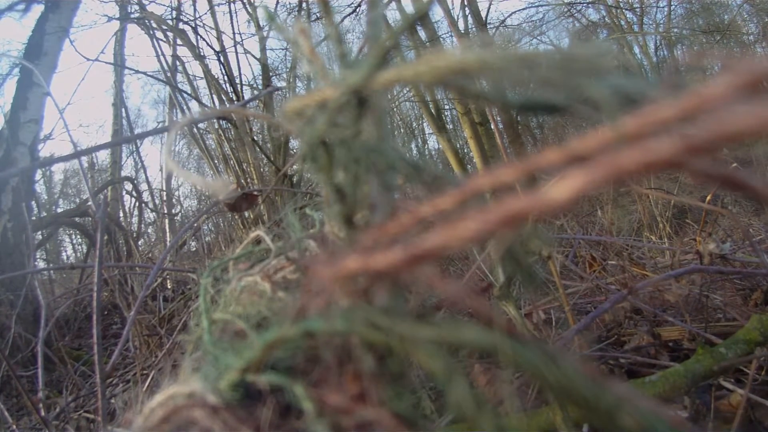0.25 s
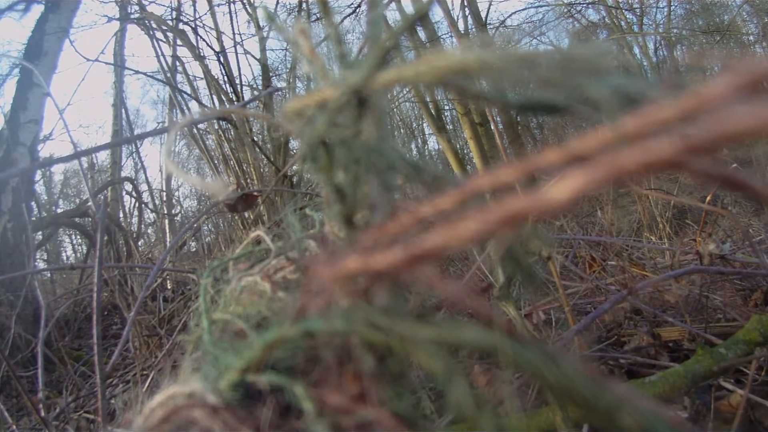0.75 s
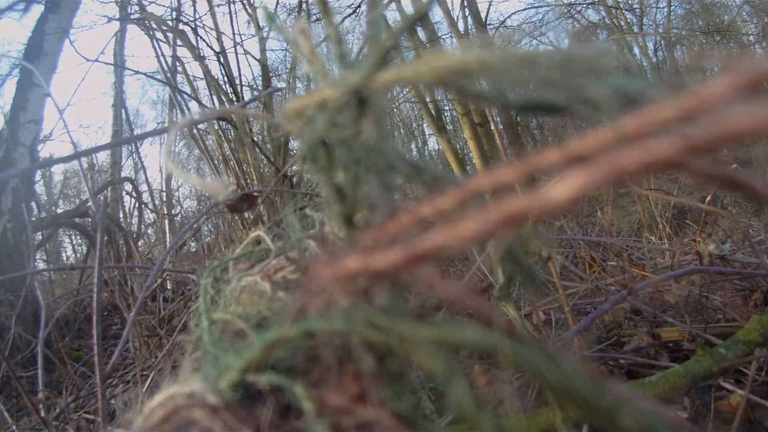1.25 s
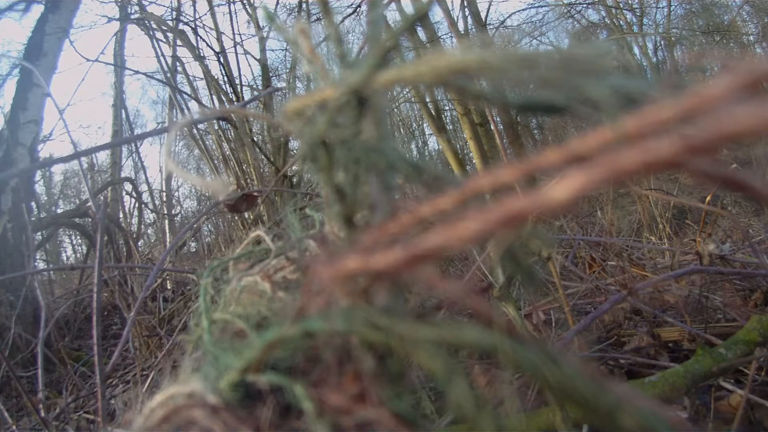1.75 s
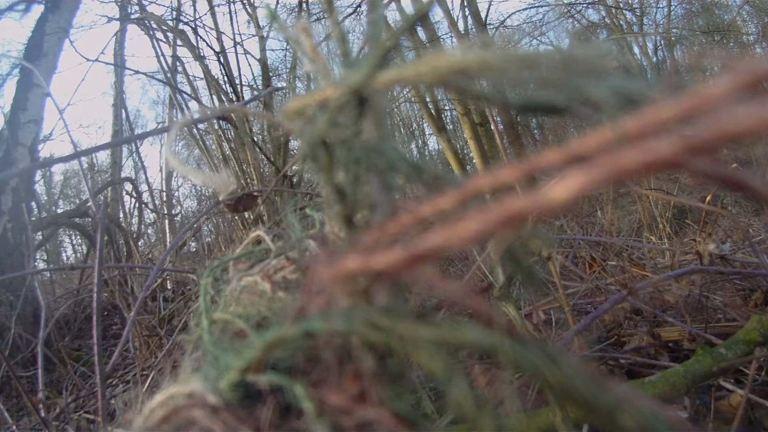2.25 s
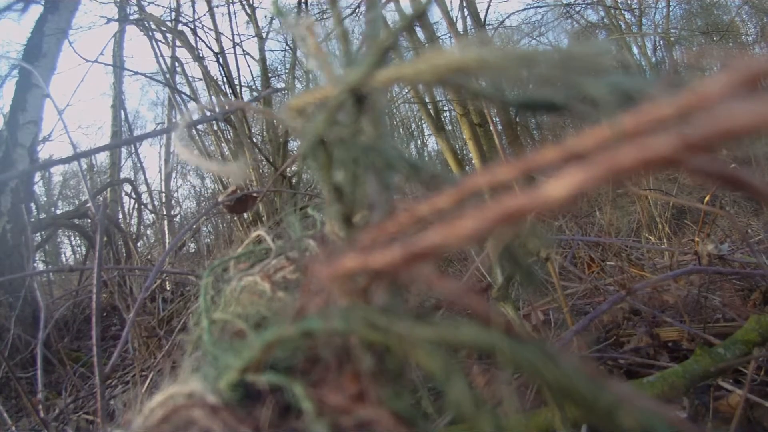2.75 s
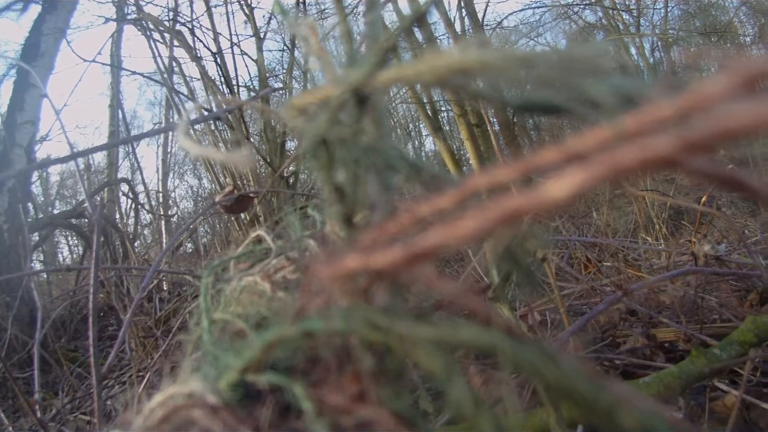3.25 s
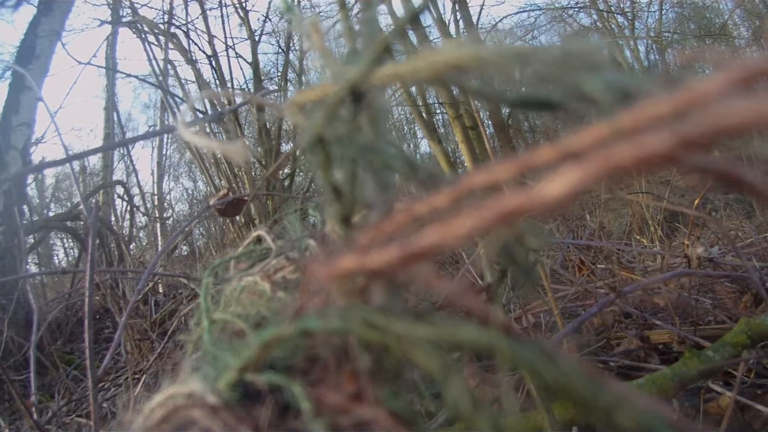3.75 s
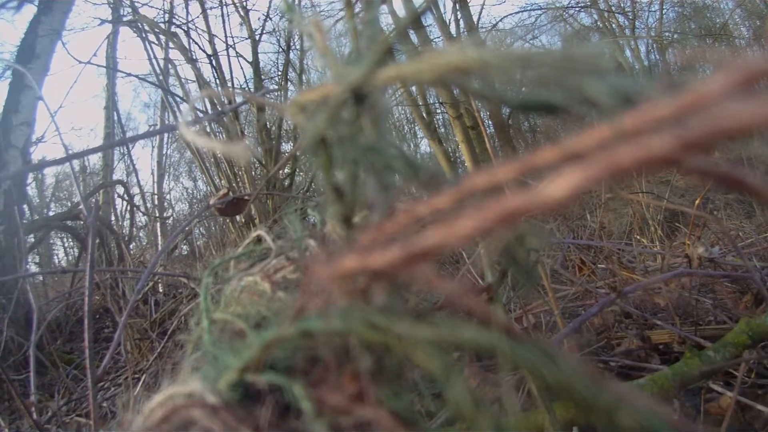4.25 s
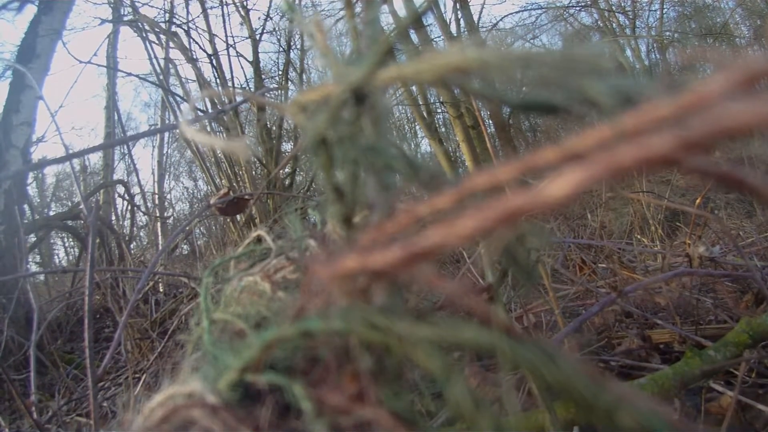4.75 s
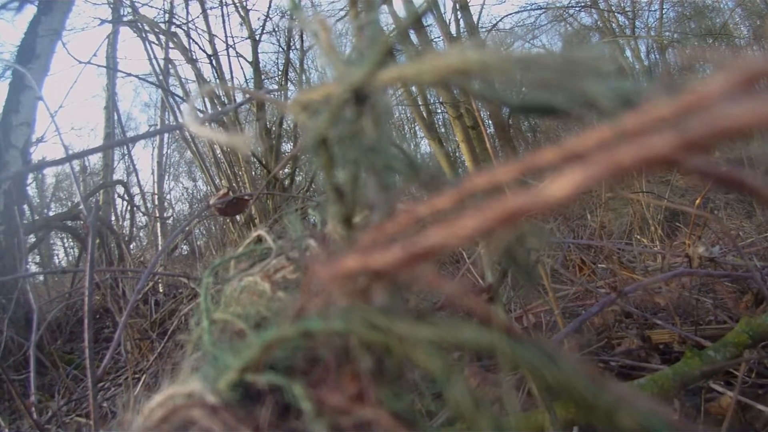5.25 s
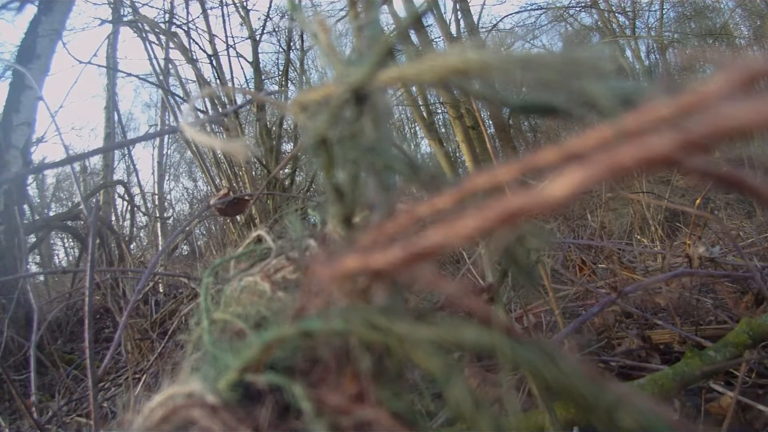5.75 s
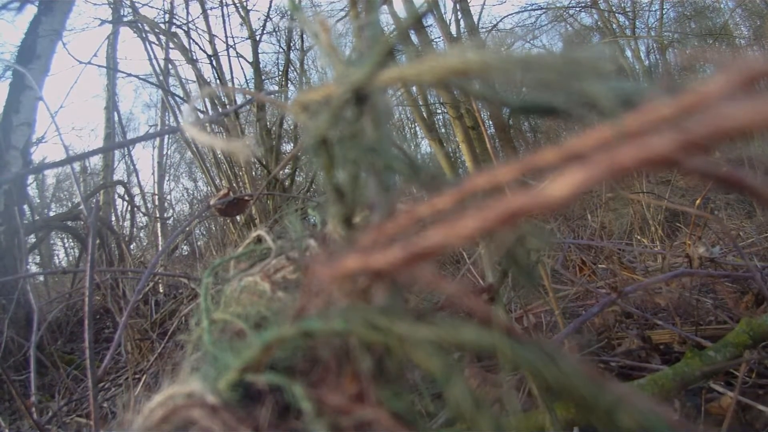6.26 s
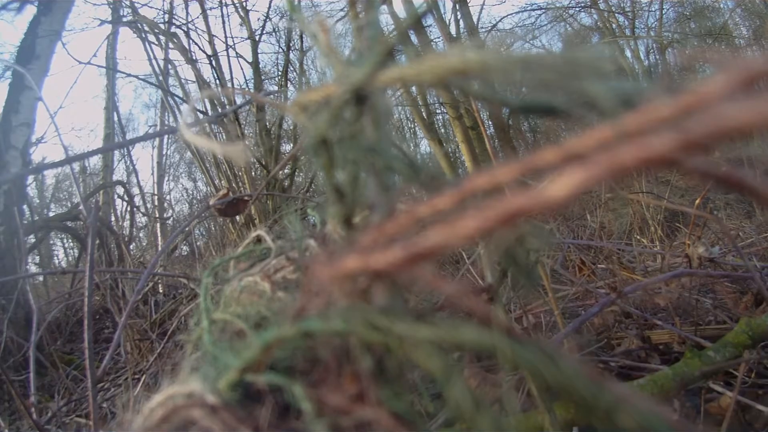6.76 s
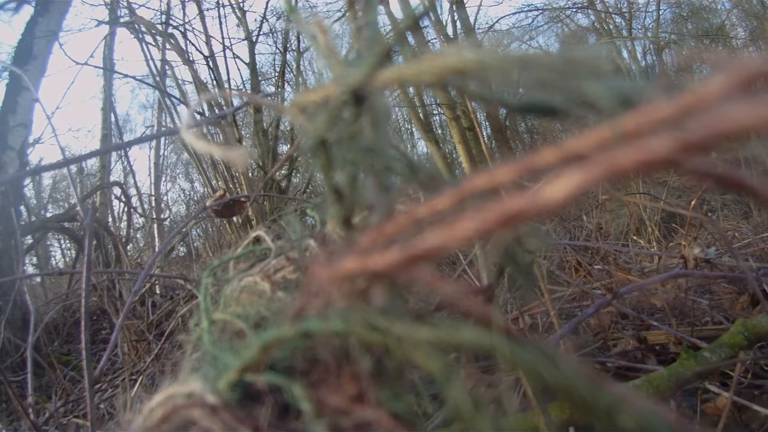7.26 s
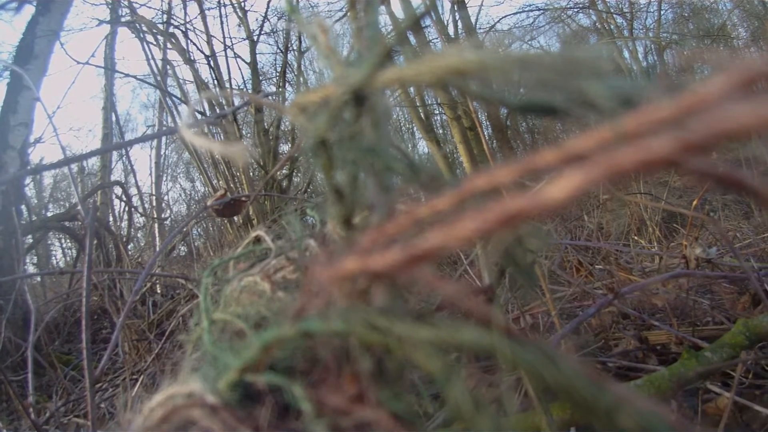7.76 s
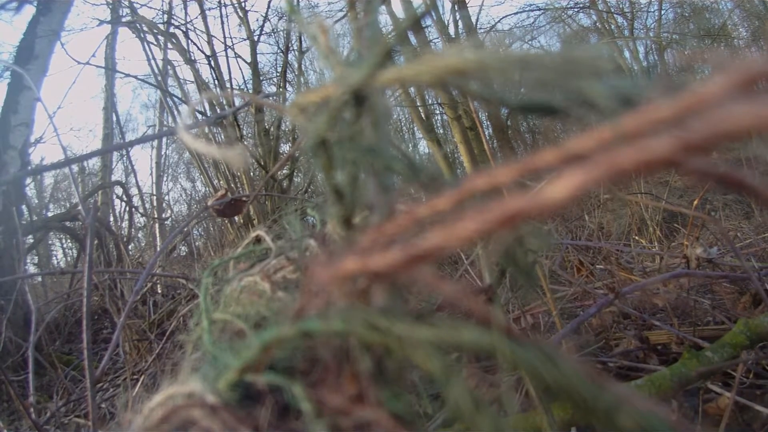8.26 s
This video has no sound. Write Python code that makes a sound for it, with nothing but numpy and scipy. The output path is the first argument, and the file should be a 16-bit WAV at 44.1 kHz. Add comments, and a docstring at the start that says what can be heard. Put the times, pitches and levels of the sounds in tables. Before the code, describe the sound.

A quiet wood with soft hush and faint hiss. A far electric airsoft gun rattles off a rapid burst, then two more cracks, each washed in tree echo. Right at the microphone another fires four separate shots: trigger click, short rising gear whine, hard bright slam, latch clack. Between them twigs or pellets snap, dry leaves rustle, and light wind rumbles and thuds on the microphone.

```python
"""Toy gun in a wood

An electric airsoft gun fires four single shots: gears rattle and whine, the piston slams, a latch clacks.
A far gun fires bursts, each shot a noise crack with a bounce and a wash of echo; twigs snap as short noise.
Dry brush rustles as grainy noise, faint tones glide as sines, and wind rumbles and thuds on the microphone.
The wood hushes softly behind it all, and each channel of the amplifier adds its own hiss.
"""
import sys
import numpy as np
from scipy import signal
from scipy.fft import rfft, irfft, next_fast_len
from scipy.io import wavfile
from scipy.ndimage import uniform_filter1d, map_coordinates

SR = 44100
rng = np.random.default_rng(int(sys.argv[2]) if len(sys.argv) > 2 else 0)


def put_to_file(sound):
    """Save the sound as 16-bit audio at rate SR, in the file named by the first command-line argument."""
    columns = np.atleast_2d(sound).T  # one column per channel
    safe = np.clip(columns, -1, 1)
    whole_steps = np.round(safe * 32767)
    wavfile.write(sys.argv[1], SR, whole_steps.astype(np.int16))


N = 375732
T = np.arange(N) / SR  # time of every sample, in seconds

# All levels are those of the sounds before record() shapes them.
# A t60 is the time in which a sound dies by 60 dB.

# The four near shots: bite_s (gears start), release_s (piston let go), whine_db (rms), hum_db
SHOTS = [(2.682, 2.7697, -22.5, -53.5), (3.77, 3.854, -24.5, -54), (4.9851, 5.0671, -21.5, -52.5),
         (7.2541, 7.3395, -21, -60.5)]
# Gear rattle through one cycle: phase (0 bite, 1 release, then 1 more each 0.1 s of coasting), level_db
GEAR_CYCLE = [(0, -50.5), (.07, -23.5), (.17, -26.5), (.33, -16), (.95, -12), (1.12, -2), (1.28, -15),
              (1.5, -12), (1.68, -17), (1.95, -35), (2.6, -54.5)]
# Tooth whine while the spring is wound: phase, pitch_hz, level_db (added to the shot's whine_db)
TOOTH_WHINE = [(0.25, 1050, -23.5), (.45, 1270, -5), (.6, 1410, 0), (.86, 1542, 0), (.95, 1550, -18.5)]
# Ringing of the gearbox shell: pitch_hz, width_hz, level_db
SHELL_RINGS = [(970, 130, -2), (1940, 340, -3), (3030, 440, -4), (3650, 120, -2), (4460, 100, -1.5),
               (5680, 290, 2.5), (6800, 1000, -3), (10000, 1400, -5.5)]
# Colour of the gear rattle: pitch_hz, level_db
RATTLE_COLOUR = [(24, -55), (40, -18), (653, -5.5), (926, -8.5), (1190, -11), (1450, -5), (1730, -12),
                 (1960, -9), (2710, -9.5), (3840, -9), (5050, -9), (5720, -8), (15500, -31)]
# The piston's slam: pitch_hz, level_db (typical), t60_s, late_s (after release)
SLAM_RINGS = [(5800, 15.5, 0.031, 0.0028), (6220, -3.5, 0.065, 0.0099), (1036, 7.5, 0.016, .008),
              (3970, 1, 0.029, .009), (249, -14, 0.11, 0), (80, -25, .07, 0)]
# The main spring humming on: pitch_hz, level_db (added to the shot's hum_db), t60_s
SPRING_HUM = [(747, 0, 1.8), (1150, -4.5, 2.2)]
# The trigger clicks twice before the gears bite: start_s (first click), level_db (its peak)
TRIGGER_CLICKS = [(2.652, -30), (3.746, -27.5), (4.964, -21)]
# The latch stops the coasting gears: start_s, level_db (peak)
LATCH_CATCHES = [(2.8979, 7.5), (3.9623, -4), (5.1879, 4.5), (7.4532, 0)]
# Contacts of every cycle, each: late_s, level_db (peak), knock_db (peak of the stock knock)
TEETH_MEET = (.0058, -7.5, -29)  # late after the bite
PISTON_RECOIL = (.034, -1, -38)  # late after the release
LATCH_REBOUND = (0.0079, -17, -34)  # late after the latch catches
# Loose contacts outside the cycle: start_s, level_db (peak), knock_db (peak of the stock knock)
LOOSE_CLACKS = [(2.8212, -5.5, -44), (2.9244, -14, -26)]
# Colour of metal contacts: pitch_hz, level_db
CLACK_COLOUR = [(180, -41), (300, -7.5), (1540, -7), (1970, -3.5), (4490, -4), (4960, -5), (6150, -3),
                (7020, -11), (9600, -10.5), (10600, -26), (15500, -22)]
LATCH_KNOCK_DB, CLACK_T60_S = -22.5, 0.02

# Shots of the far gun: start_s, level_db (peak of the crack)
FAR_SHOTS = [(1.1924, -22), (1.2967, -22), (1.3994, -20), (1.508, -21.5), (1.615, -23), (1.7242, -21),
             (1.8365, -22.5), (1.966, -28), (2.4654, -23), (2.574, -21)]
# Colour of the far gun: pitch_hz, level_db
FAR_COLOUR = [(400, -40), (1000, -6.5), (1500, -6.5), (2500, -12), (3100, -9.5), (3600, -2.5), (4300, -1.5),
              (4900, -1), (5400, -3.5), (6000, -0.5), (6700, -6.5), (8000, -13), (9500, -25),
              (15000, -50.5)]
FAR_ECHO_DB = 13.5  # echo energy over crack peak
# How long the trees' answer lasts: pitch_hz, t60_s
TREE_ECHO = [(300, 0.47), (2000, .5), (6000, .6), (12000, 0.42)]

# Snaps of pellets and twigs: start_s, level_db (bright peak), dull_db and echo_db (over that peak)
SNAPS = [(0.0866, -31.5, -8, -6), (0.332, -32.5, -21, -8), (0.469, -37, -10, -9), (2.9746, -19, -25, 3.5),
         (3.247, -38, -1.5, -2.5), (3.341, -36, -7, -3), (3.4744, -32.5, -10, -6.5), (4.2193, -40, 5.5, 0),
         (4.3482, -32, -5.5, 1), (4.367, -35.5, -5, -0.5), (4.376, -35, -1.5, -2), (4.415, -38, -5, 0.3),
         (5.6397, -14.5, -45, 3), (5.7667, -41, 4.5, 5), (5.8665, -41.5, -5, 16.5),
         (6.2713, -40, -19.5, -2.5), (7.1031, -34.5, -19, 0.7), (7.9172, -12.5, -45.5, 3),
         (7.981, -30, -2.5, -0.5), (8.275, -37, -23, 2.1)]
# Decay of a snap at -34.5 dB; louder snaps are harder and die sooner
SNAP_T60_S, SHARPER_PER_DB = 0.018, 0.07
CRACKLE_DB, CRACKLE_SPREAD_DB = -45.5, 3  # faint twigs: lowest peak, average extra

# Rustles of dry brush: start_s, level_db (before the swell and decay), t60_s
RUSTLES = [(0.19, -55.5, 0.29), (1.948, -46, .05), (2.105, -51, 0.48), (2.441, -42.5, 0.18),
           (3.174, -43, 0.27), (3.221, -34, 1.07), (4.12, -47, 0.59), (4.811, -55.5, 0.27), (5.9, -57, 1.8),
           (6.45, -54, 2), (6.999, -56.5, 1.32), (8.37, -54, 0.38)]
# Colour of dry leaves: pitch_hz, level_db
LEAF_COLOUR = [(760, -51.5), (1300, -15.5), (1850, -4), (2710, -6.5), (4780, -1), (6870, -7), (9080, -26),
               (12000, -28.5), (15600, -61.5), (22000, -120)]
RISE_S = 0.011  # rise time at a t60 of 1 s; it grows with the square of the t60

# Faint high tones that bend on the way, the last perhaps a bird:
# start_s, length_s, pitch_hz, sag_hz, end_hz (end over start), level_db
GLIDING_TONES = [(4.08, .14, 2690, -4, 60, -55), (4.12, .12, 2260, 0.5, 110, -59.5),
                 (4.445, .055, 5250, 60, -30, -61), (8.226, 0.071, 5480, 210, -170, -50.5)]

# Strength of the wind: time_s, rumble_db (rms)
WIND_STRENGTH = [(0.0, -82), (2.5, -79), (3.1, -65), (4.05, -66.5), (4.9, -59), (5.3, -55.5), (5.75, -64),
                 (6.0, -56.5), (6.5, -54.5), (6.8, -55.5), (7.3, -58), (8.52, -69)]
# Colour of the wind rumble: pitch_hz, level_db
GUST_COLOUR = [(12, -31.5), (20, 7), (44, 1), (107, -13.5), (216, -18), (400, -19), (520, -54), (880, -120)]
# Wind thuds at set times: start_s, level_db (peak)
SET_THUDS = [(4.829, -44), (6.011, -38.5), (6.349, -41), (6.397, -38), (6.43, -38.5), (6.45, -42),
             (6.544, -45), (6.584, -45), (6.619, -42), (6.66, -44), (7.979, -37.5)]
THUD_OVER_WIND_DB, THUD_SPREAD_DB = 9, 2  # further thuds: lowest peak over the rumble, average extra
# Colour of the hush of the wood: pitch_hz, level_db
HUSH_COLOUR = [(18, -27), (30, 1.5), (43, 1), (144, -0.5), (606, -8), (728, -6), (1170, -5), (3400, -9),
               (5450, -7), (9190, -16), (14300, -19), (15500, -24)]
# Colour of the amplifier hiss: pitch_hz, level_db
HISS_COLOUR = [(290, -44), (500, -22.5), (1240, -2), (1750, -14), (1930, -8.5), (4840, -4.5), (15500, 0.5)]
HUSH_DB, HISS_DB = -54.5, -61
TOP_HZ = 15600  # nothing sounds above this pitch


def gun():
    """The near gun: turning gears, piston slams, metal contacts and trigger clicks."""
    return gears() + slams() + contacts() + trigger()


def gears():
    """Teeth rattle in the shell all cycle long; under load their rate sings as a rising whine."""
    out = np.zeros(N)
    uneven = amp(2.3 * wobble(700) + 0.56 * wobble(70))
    rattle = unit(filtered(uneven * noise(RATTLE_COLOUR), lambda f: shell(f) ** 1.24))
    for bite, release, whine_db, _ in SHOTS:
        phase = np.interp(T, [bite, release, release + 0.2], [0, 1, 3], left=-1)
        rattle_db = np.interp(phase, *np.transpose(GEAR_CYCLE), left=-120, right=-120)
        out += amp(rattle_db) * rattle
        out += whine(phase, whine_db)
    return out


def whine(phase, level_db):
    """Worn teeth sing a tone with two overtones that wavers in pitch and size."""
    at, hz, db = np.transpose(TOOTH_WHINE)
    pitch = np.interp(phase, at, hz) * (1 + 0.0081 * wobble(150))
    turn = 2 * np.pi * np.cumsum(pitch) / SR
    tooth = unit(np.sin(turn) + 0.27 * np.sin(2 * turn) + 0.33 * np.sin(3 * turn))
    swell_db = np.interp(phase, at, db, left=-120, right=-120)
    return amp(level_db + swell_db + 1.0 * wobble(200)) * tooth


def shell(f):
    """The gearbox shell strengthens some pitches of what moves in it."""
    return 0.16 + sum(amp(db) * np.abs(band(f, hz, width)) for hz, width, db in SHELL_RINGS)


def slams():
    """The piston rings the cylinder head, the trees answer and the spring hums on."""
    out, t = np.zeros(N), T[:SR]
    for _, release, _, hum_db in SHOTS:
        for hz, db, t60, late in SLAM_RINGS:
            drift = np.cumsum(rng.normal(0, 0.08, SR))
            ring = burst(t, 0.00046, t60) * np.sin(2 * np.pi * hz * t + drift)
            add(out, release + late, amp(db + rng.normal(0, 0.9)) * ring)
        add(out, release, amp(-2) * burst(t, 0.00074, 0.05) * noise(CLACK_COLOUR, size=SR))
        add(out, release, amp(6.0) * echo(lambda f: amp(along(RATTLE_COLOUR, f)) * shell(f)))
        for hz, db, t60 in SPRING_HUM:
            add(out, release, amp(hum_db + db - 60 * t / t60) * np.sin(2 * np.pi * hz * t))
    return out


def contacts():
    """Small metal hits crack as bursts of noise and knock the hollow stock."""
    out, t = np.zeros(N), T[:SR // 5]
    hollow = lambda f: np.abs(band(f, 450, 700))
    for s, db, knock_db in contact_list():
        # a sharp hit with a ragged, weaker shudder behind it
        shape = burst(t, 0.00081, CLACK_T60_S) + 0.07 * burst(t, 0.0033, 5.2 * CLACK_T60_S)
        crack = shape * filtered(noise(CLACK_COLOUR, size=len(t)), shell)
        drift = np.cumsum(rng.normal(0, 0.014, len(t)))
        knock = burst(t, 0.0051, 0.069) * np.sin(2 * np.pi * 246 * t + drift)
        hollow_noise = unit(filtered(rng.standard_normal(len(t)), hollow))
        knock += 0.56 * burst(t, 0.0037, 0.065) * hollow_noise
        add(out, s, peak(crack, db) + peak(knock, knock_db))
    return out


def contact_list():
    """Metal parts touch at set points of each cycle: rows of start_s, level_db, knock_db."""
    rows = list(LOOSE_CLACKS)
    for (bite, release, *_), (latch, latch_db) in zip(SHOTS, LATCH_CATCHES):
        rows.append((latch, latch_db, LATCH_KNOCK_DB))
        for s, contact in (bite, TEETH_MEET), (release, PISTON_RECOIL), (latch, LATCH_REBOUND):
            late, db, knock_db = contact
            rows.append((s + late, db, knock_db))
    return rows


def trigger():
    """The trigger clicks twice, as two short bursts of metal-coloured noise."""
    out, t = np.zeros(N), T[:SR // 5]
    for s, db in TRIGGER_CLICKS:
        first = burst(t, 0.0005, 0.015) * noise(CLACK_COLOUR, size=len(t))
        second = burst(t, 0.00046, 0.025) * noise(CLACK_COLOUR, size=len(t))
        add(out, s, peak(first, db))
        add(out, s + 0.0067, peak(second, db - 2))
    return out


def far_gun():
    """Each far shot is a short crack, a bounce off the ground and a long wash."""
    out, t = np.zeros(N), T[:SR // 10]

    def crack_tone(f):
        """The crack is stronger around three pitches, the top one a ring of the microphone."""
        low, middle = np.abs(band(f, 3600, 350)), np.abs(band(f, 5000, 400))
        return 0.81 + low + middle + 0.5 * np.abs(band(f, 6050, 310))

    def wash(f):
        """The echo is stronger around two pitches."""
        return 0.55 + 0.6 * np.abs(band(f, 4300, 700)) + 0.96 * np.abs(band(f, 6000, 700))

    for s, db in FAR_SHOTS:
        crack = burst(t, 0.0021, 0.0173) * filtered(noise(FAR_COLOUR, size=len(t)), crack_tone)
        crack = peak(crack, db)
        add(out, s, crack)
        add(out, s + 0.0084, amp(-10.0 + rng.normal(0, 1.5)) * crack)  # the bounce
        answer = echo(lambda f: amp(along(FAR_COLOUR, f)) * wash(f))
        add(out, s, amp(db + FAR_ECHO_DB) * answer)
    return out


def snaps():
    """Pellets and twigs make brief bursts: a bright crack, a duller body and the trees' answer."""
    out, t = np.zeros(N), T[:SR // 10]
    bright = lambda f: np.abs(band(f, 5560, 4400)) ** 2 / (1 + (f / 10000) ** 4)
    dull = lambda f: np.abs(band(f, 1300, 1600)) ** 2
    faint = []
    for at, size in rng.random(size=(12, 2)):  # faint twigs at chance times
        db = CRACKLE_DB - CRACKLE_SPREAD_DB * np.log(1 - size)
        faint.append((at * T[-1], db, -14, -1.5))
    for s, db, dull_db, echo_db in [*SNAPS, *faint]:
        t60 = SNAP_T60_S * np.exp(-SHARPER_PER_DB * (db + 34.5))
        for colour, top_db in (bright, db), (dull, db + dull_db):
            grains = filtered(rng.standard_normal(len(t)), colour)
            add(out, s, peak(burst(t, 0.00075, t60) * grains, top_db))
        add(out, s, amp(db + echo_db) * echo(bright))
    return out


def brush():
    """Dry leaves: finely grained noise that swells and dies away, long rustles swelling more slowly."""
    swell, t = np.zeros(N), T[:2 * SR]
    for s, db, t60 in RUSTLES:
        rise = 1 - np.exp(-t / (RISE_S * t60 ** 2))
        add(swell, s, amp(db - 60 * t / t60) * rise)
    grain = amp(1.6 * wobble(380) + 0.6 * wobble(14))
    return swell * unit(grain * noise(LEAF_COLOUR))


def gliding_tones():
    """Each faint tone is a gliding, slightly fluttering sine that swells and fades."""
    out, flutter = np.zeros(N), amp(2.5 * wobble(80))
    for s, length, hz, sag_hz, end_hz, db in GLIDING_TONES:
        u = np.linspace(0, 1, round(length * SR))  # 0 to 1 through the tone
        arch = np.sin(np.pi * u)
        turn = 2 * np.pi * np.cumsum(hz + end_hz * u - sag_hz * arch) / SR
        add(out, s, np.sqrt(2) * amp(db) * np.abs(arch) ** 0.6 * np.sin(turn))
    return out * flutter


def wind():
    """Eddies press on the microphone: a lumpy low rumble and separate low thuds."""
    strength_db = lambda s: np.interp(s, *np.transpose(WIND_STRENGTH))
    lumps = amp(2.7 * wobble(26))
    out = amp(strength_db(T)) * unit(lumps * noise(GUST_COLOUR))
    t = T[:SR // 10]
    # further thuds, at chance times, follow the wind's strength
    at, size = rng.random(size=(40, 2)).T
    at = at * T[-1]
    further_db = strength_db(at) + THUD_OVER_WIND_DB - THUD_SPREAD_DB * np.log(1 - size)
    for s, db in [*SET_THUDS, *zip(at, further_db)]:
        hz = 80 * amp(rng.normal(0, 1.6))
        thud = -burst(t, 0.0018, 0.045) * np.sin(2 * np.pi * hz * t)
        add(out, s, peak(thud, db))
    return out


def hush():
    """The hush of the wood: steady coloured noise whose level wavers a little."""
    return amp(HUSH_DB + 0.32 * wobble(4.3)) * noise(HUSH_COLOUR)


def echo(colour):
    """The trunks' answer to a click of this colour, energy 1: each pitch dies at its own speed."""
    hz, t, z = signal.stft(rng.standard_normal(SR), SR, nperseg=256)
    decay = amp(-60 * t / along(TREE_ECHO, hz)[:, None])
    z = z * colour(hz)[:, None] * decay * (1 - np.exp(-t / 0.011))
    # trunks stand unevenly, so the answer comes in patches
    patches = uniform_filter1d(rng.standard_normal(z.shape), size=5, axis=0)
    patches = uniform_filter1d(patches, size=9, axis=1)
    z = z * amp(1.4 * unit(patches))
    tail = signal.istft(z, SR, nperseg=256)[1][:SR]
    return tail / np.linalg.norm(tail)


def burst(t, rise, t60):
    """A soft-edged start and an even decay, with a t60 of at least 3 ms."""
    return (1 - np.exp(-t / rise)) ** 2 * amp(-60 * t / max(t60, 0.003))


def band(f, hz, width):
    """One resonance: it answers most strongly at its own pitch."""
    return 1j * f * width / (hz * hz - f * f + 1j * f * width)


def noise(spectrum, size=N):
    """Coloured noise of rms 1."""
    return unit(filtered(rng.standard_normal(size), lambda hz: amp(along(spectrum, hz))))


def filtered(x, response):
    """Change the strength and timing of each pitch in x by a response."""
    n = x.shape[-1]
    m = next_fast_len(n + 8192)  # silent room at the end for the filter to ring out
    return irfft(rfft(x, m) * response(np.fft.rfftfreq(m, 1 / SR)), m)[..., :n]


def wobble(rate):
    """A smooth random curve through this many random points a second."""
    return map_coordinates(rng.standard_normal(int(N * rate / SR) + 4), [T * rate])


def along(points, hz):
    """Read a curve of (pitch_hz, value) points, with pitch on a log scale."""
    f, v = np.transpose(points)
    return np.interp(np.log(hz + 1), np.log(f + 1), v)


def amp(db):
    """Turn decibels into a plain multiplier."""
    return 10 ** (np.asarray(db) / 20)


def unit(x):
    """Scale x to an rms of 1."""
    return x / np.sqrt(np.mean(x ** 2) + 1e-20)


def peak(x, db):
    """Scale x to a peak level."""
    return amp(db) * x / np.max(np.abs(x))


def add(x, s, sound):
    """Mix a sound into x from s seconds on."""
    part = x[round(s * SR):][:len(sound)]
    part += sound[:len(part)]


def scene():
    """One microphone capsule feeds both channels."""
    mono = gun() + far_gun() + snaps() + brush() + gliding_tones() + wind() + hush()
    return np.tile(mono, (2, 1))


def record(dry):
    """The input loses deep bass and clips loud peaks; bass leans left and lags there; each channel hisses."""
    x = filtered(dry, lambda f: (1j * f / (1j * f + 25)) ** 2)
    x = x / (1 + np.abs(x / 0.98) ** 12) ** (1 / 12)  # rounded clipping
    lean = lambda f: 0.8 / (1 + 1j * f / 75) / (1 + (f / 1600) ** 4)
    left_right = np.array([[1], [-1]])
    x = filtered(x, lambda f: 1 + left_right * lean(f))
    hiss = np.array([noise(HISS_COLOUR), noise(HISS_COLOUR)])
    x = np.clip(x + amp(HISS_DB) * hiss, -1, 1)
    return filtered(x, lambda hz: hz < TOP_HZ)


dry = scene()
out = record(dry)
put_to_file(out)
```